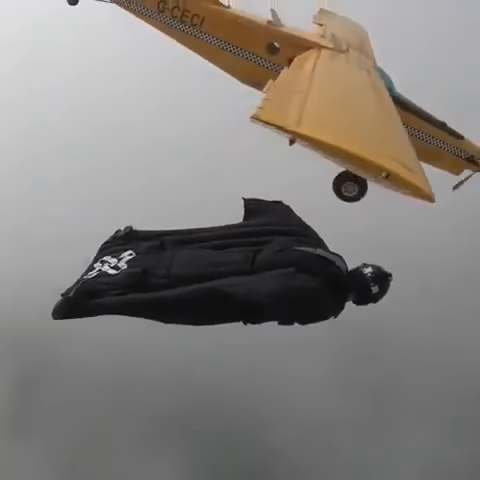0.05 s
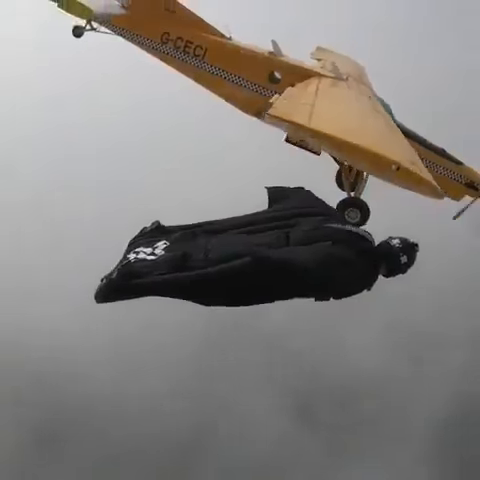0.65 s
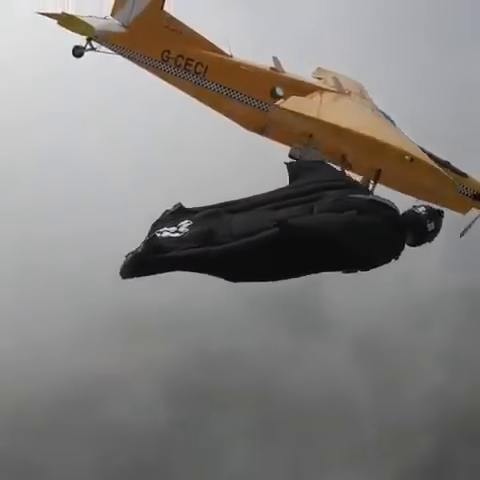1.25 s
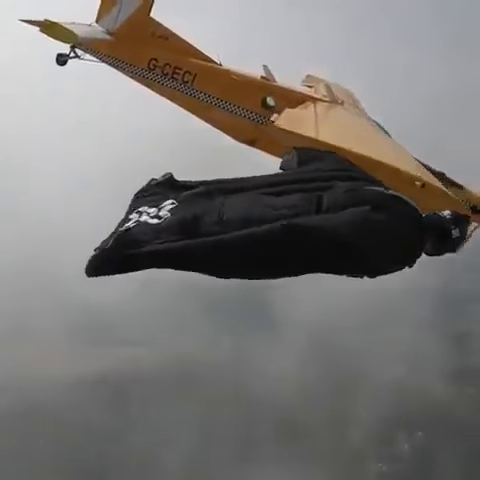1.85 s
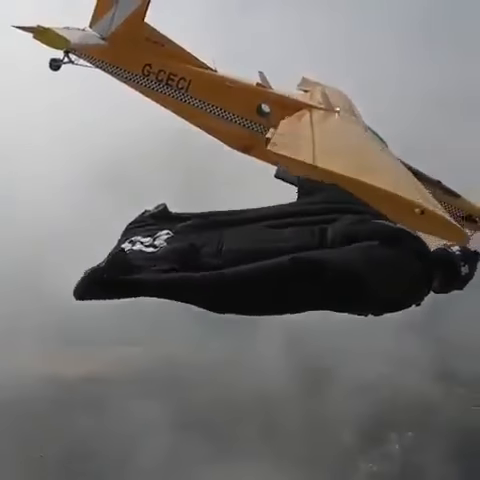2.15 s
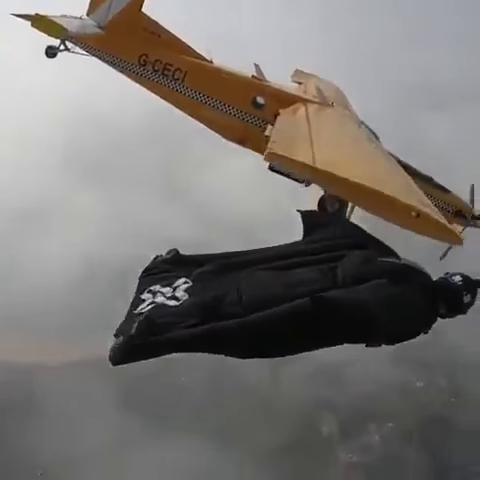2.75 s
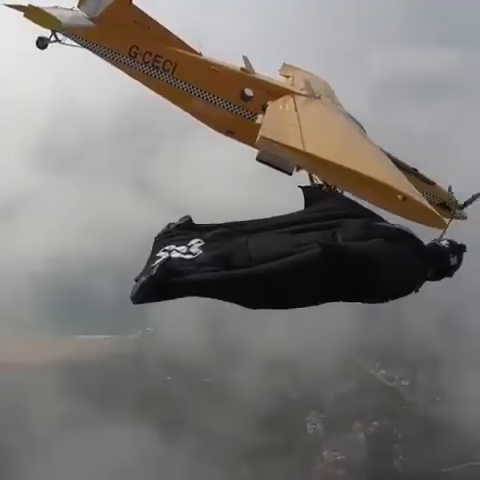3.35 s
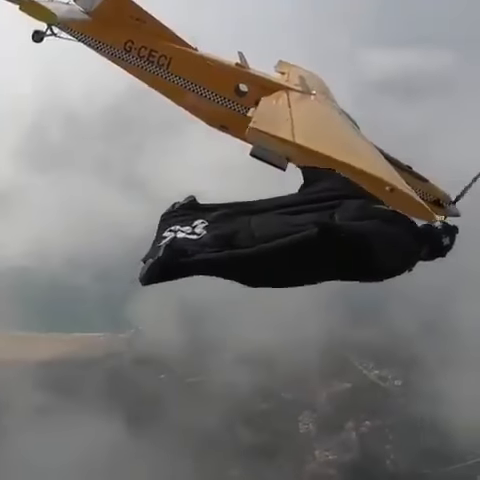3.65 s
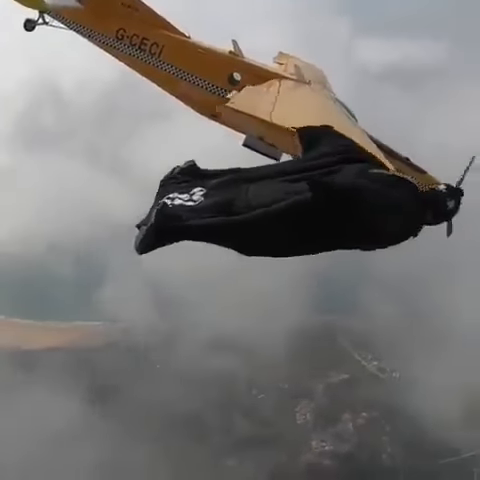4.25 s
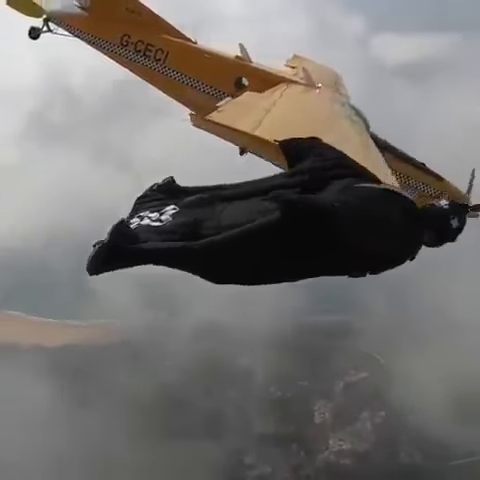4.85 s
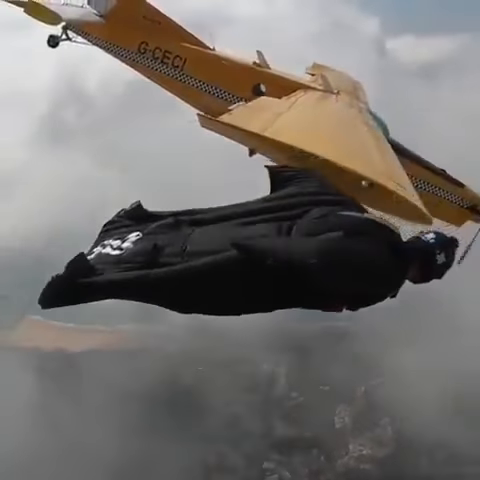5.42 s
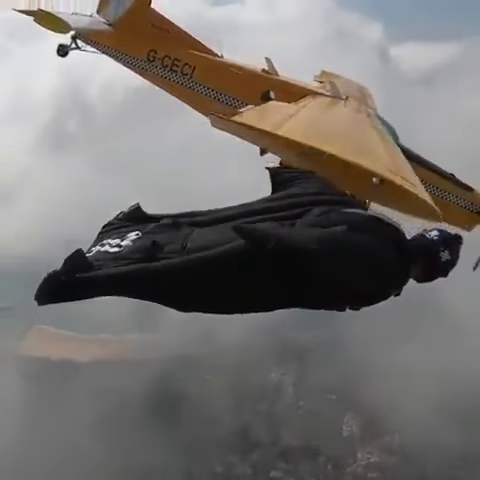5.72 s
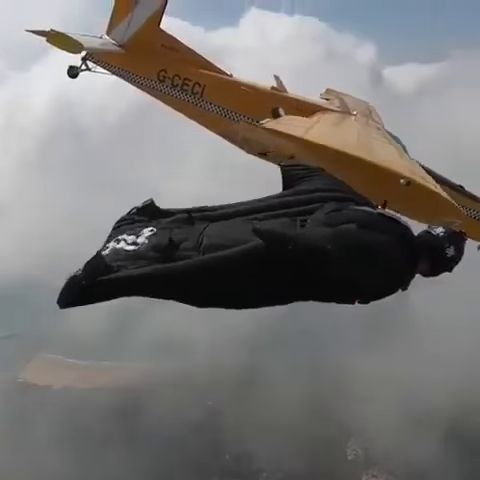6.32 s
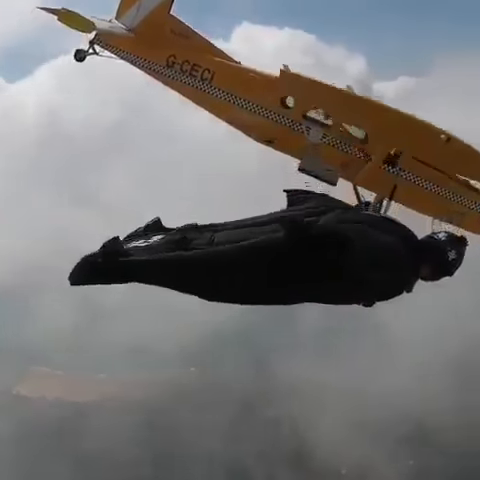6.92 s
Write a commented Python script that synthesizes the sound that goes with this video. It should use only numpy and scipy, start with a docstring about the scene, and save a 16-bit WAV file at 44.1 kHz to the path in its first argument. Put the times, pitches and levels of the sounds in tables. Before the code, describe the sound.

A loud, steady rush of wind buffets a microphone in flight, making a deep unbroken roar with a light hiss above.

```python
"""High in the open air, wind rushes over a camera in free flight.
Swirls of air (eddies) pound the microphone opening in a deep, unbroken roar, now and then with a
stronger thump. Above it, air sliding over the camera's case hisses, and a gap whistles faintly.
A quick limiter, which turns loud moments down, holds the roar at an even level."""
import sys
import numpy as np
from scipy import signal
from scipy.io import wavfile
from scipy.ndimage import uniform_filter1d

SR = 44100
rng = np.random.default_rng(int(sys.argv[2]) if len(sys.argv) > 2 else 0)


def wrap_up_sound(samples):
    """Save the sound to the file named by the first command line argument, as 16-bit audio."""
    columns = np.atleast_2d(samples).T
    # keep every value between -1 and 1, then stretch to whole-number steps
    tamed = np.clip(columns, -1, 1)
    steps = np.round(tamed * 32767).astype(np.int16)
    wavfile.write(sys.argv[1], SR, steps)


N = 307818
FRAME, HOP = 2048, 256  # noise is shaped in overlapping slices: their length and step in samples
HZ = np.fft.rfftfreq(FRAME, 1 / SR)
TIMES = np.arange(N // HOP + 9) * HOP / SR

# How the hiss swells as the case turns in the wind.
# Each row: time in seconds, swell of the coarse part, swell of the airy part.
HISS_SWELLS = [(0.0, -1.5, 1.5), (0.3, 0.9, -7.5), (0.75, -0.1, -4), (1.4, -2, -1.5), (1.8, -1.5, 0.2),
               (2.15, -1.4, 1.3), (2.65, 0, 2.5), (3.1, 0.6, 1.5), (3.45, 1.5, -0.7), (3.7, -0.5, -1.5),
               (4.05, 0.4, -5), (4.25, 2, -1.8), (4.47, 0.5, -1.7), (4.72, 3.5, 0), (4.93, 0.5, -0.5),
               (5.17, 3.5, -0.5), (5.35, 0.5, -3.5), (5.6, -1.1, -1.3), (6.02, 0.5, 0.5), (6.22, 0, -2.5),
               (6.5, -0.1, -3.5), (6.8, 0.5, -2), (6.98, 1, -5)]
# Single strong eddies that thump the microphone.
# Each row: middle in seconds, half length in seconds, pitch in Hz, peak in dB before the limiter.
STRONG_EDDIES = [(0.333, .02, 124, -11.5), (0.817, .03, 74, -10.5), (0.992, .02, 79.9, -4.5),
                 (1.695, .03, 76, -9), (2.496, .04, 80, -10.5), (3.208, .022, 69.6, -7),
                 (3.319, .02, 246, -9), (3.461, .04, 94, -11.5), (4.412, .024, 74, -9),
                 (4.84, 0.016, 203.6, -10.5), (5.254, .02, 174.5, -9.5)]


def amp(db):
    """Turns decibels into a gain."""
    return 10 ** (np.asarray(db) / 20)


def unit(x):
    """Scales a signal to an average (rms) level of 1."""
    return x / np.sqrt(np.mean(x ** 2) + 1e-20)


def colour(hz, values):
    """Joins values at a few pitches into a curve over all frequencies."""
    return np.interp(np.log(HZ + 1), np.log(hz), values)


def curve(rows, column=1):
    """Joins one column of a table into a curve over time, one value a slice."""
    table = np.transpose(rows)
    return np.interp(TIMES, table[0], table[column])[:, None]


def bell(x, middle, half_width):
    """A smooth hump of height 1."""
    return np.exp(-((x - middle) / half_width) ** 2)


def band(centre_hz, octaves):
    """A smooth hump around one pitch."""
    return bell(np.log2(HZ + 1), np.log2(centre_hz), octaves)


def spot(middle_s, half_s, shape):
    """Fades a shape over frequency in and out around one moment."""
    return np.outer(bell(TIMES, middle_s, half_s), shape)


def patches(span_s, span_hz):
    """Random unevenness over time and frequency, at level 1."""
    field = rng.standard_normal((len(TIMES), len(HZ)))
    field = uniform_filter1d(field, max(1, round(span_s * SR / HOP)), axis=0)
    return unit(uniform_filter1d(field, max(1, round(span_hz * FRAME / SR)), axis=1))


def noise(shape_db):
    """Noise at level 1 that follows a shape over time and frequency."""
    white = rng.standard_normal((len(TIMES) - 1) * HOP)
    slices = signal.stft(white, nperseg=FRAME, noverlap=FRAME - HOP)[2]
    shaped = signal.istft(slices * amp(shape_db).T, nperseg=FRAME, noverlap=FRAME - HOP)[1]
    return unit(shaped[:N])


def air_speed(usual_edge_hz=600):
    """How fast the air passes the microphone; 1 is the usual speed."""
    # Faster air makes the roar reach higher. Each row: time in seconds, top edge of the roar in Hz.
    roar_edge = [(0, 620), (.55, 611), (1, 608), (1.3, 588), (1.8, 580), (2.2, 592), (2.5, 578),
                 (2.85, 588), (3.3, 590), (3.7, 586), (4.5, 594), (5, 594), (5.5, 597), (5.85, 600),
                 (6.98, 617)]
    return curve(roar_edge) / usual_edge_hz


def eddy_roar():
    """Eddies of all sizes hit the microphone; faster air sheds them faster and lifts the roar's pitch."""
    # The push of the eddies. Each row: frequency in Hz, relative level in dB.
    roar_tone = [(10, -24), (22, -4), (38, 0), (78, -0.5), (115, -2.13), (175, -6), (300, -8), (480, -10),
                 (590, -13.5), (675, -20), (745, -27), (900, -35), (1200, -44.5), (2500, -83.5)]
    # The deepest rumble. Each row: time in seconds, swell.
    rumble_swells = [(0.0, 1), (0.22, -10), (0.35, -5.5), (0.6, -5.5), (0.97, -7), (1.1, 7), (1.32, 15),
                     (1.55, -6.5), (2.0, -3.5), (2.13, -13.5), (2.35, -3), (2.62, -2), (3.1, 8.5),
                     (3.55, 2), (3.92, 4.5), (4.06, -9.5), (4.33, -12), (4.55, 6), (4.78, 3.5), (5.0, 0),
                     (5.22, 12.5), (5.53, -12.5), (5.67, 7.5), (6.1, 6.5), (6.35, 2), (6.6, 15.5),
                     (6.98, -2.5)]
    # Big eddies grow at the cost of middling ones. Each row: frequency in Hz, dB per step of swell.
    rumble_shares = [(40, 0.32), (100, -0.08), (250, 0.05), (450, 0)]
    # One size of eddy thins out and the roar turns hollow.
    # Each row: middle in seconds, half length in seconds, pitch in Hz, change in dB.
    lulls = [(0.352, 0.4, 417, -3), (1.3, .2, 194, -2), (1.35, .06, 95, -5), (2.516, 0.09, 730, -2.5),
             (2.79, 0.22, 107.4, -4), (2.956, 0.17, 340, -3.5), (3.286, 0.036, 60, -11),
             (3.718, 0.37, 522, -5), (3.78, .1, 188, -5.5), (4.92, 0.76, 96.4, -3), (5.08, 0.21, 560, -1.5),
             (5.98, 0.04, 90, -7.5), (6.12, .38, 206, -3.5)]
    # One size of eddy takes over, in a low boom or a hollow whoop. The rows read like those of the lulls.
    surges = [(0.2, 0.33, 100, 3), (0.65, 0.3, 203, 4), (1.57, 0.19, 350, 4), (2.151, 0.17, 205, 8),
              (2.203, .1, 100, 3.5), (2.807, .08, 870, 7), (3.5, .22, 255, 3), (3.78, 0.1, 79.4, 1.5),
              (4.137, 0.07, 173, 2.5), (4.434, 0.07, 320, 5), (4.593, 0.41, 565, 2.3),
              (4.86, 0.08, 207, 4.5), (5.348, 0.33, 168, 3.5), (5.503, 0.077, 95.5, 6.5),
              (5.797, 0.1, 556, 4), (6.198, 0.56, 880, 4), (6.92, 0.11, 636, 1.5)]
    # The opening rings with a hollow note that sinks as the camera turns.
    # Each row: time in seconds, pitch in Hz, gain in dB.
    hollow_note = [(1.7, 520, -0.5), (1.87, 530, 5.5), (2.25, 582, 4.5), (2.7, 538, 1), (3.2, 480, 2),
                   (3.7, 476, 1), (4.0, 477, -1)]

    tone_hz, tone_db = np.transpose(roar_tone)
    shape_db = np.interp(np.log((HZ + 1) / air_speed()), np.log(tone_hz), tone_db)
    shape_db += curve(rumble_swells) * colour(*np.transpose(rumble_shares))
    shape_db += 0.59 * curve(HISS_SWELLS) * band(215, octaves=0.62)  # swells with the coarse hiss
    for middle, half, hz, change_db in lulls:
        shape_db += change_db * spot(middle, half, band(hz, octaves=0.39))
    for middle, half, hz, change_db in surges:
        shape_db += change_db * spot(middle, half, bell(HZ, hz, half_width=25 + 0.083 * hz))
    for middle, half, hz, _ in STRONG_EDDIES:  # each sweeps away smaller eddies near its pitch
        shape_db -= 0.5 * spot(middle, half, band(hz, octaves=0.39))
    shape_db += curve(hollow_note, column=2) * bell(HZ, curve(hollow_note), half_width=28)
    shape_db += 0.62 * patches(span_s=0.31, span_hz=110)
    return amp(-11.5) * noise(shape_db)


def limit(x, ceiling_db, span_s):
    """Turns the sound down smoothly wherever its level nears the ceiling."""
    window = signal.windows.hann(max(3, round(span_s * SR)))
    power = abs(signal.oaconvolve(x ** 2, window / window.sum(), "same"))
    return x / (1 + (power / amp(ceiling_db) ** 2) ** 2) ** (1 / 4)


def roar_limiter(pressure, split_hz=160):
    """Holds down the bass and the rest separately, then both together more quickly."""
    bass = signal.sosfiltfilt(signal.butter(3, split_hz, fs=SR, output="sos"), pressure)
    held_bass = limit(bass, ceiling_db=-9.5, span_s=0.074)
    held_rest = limit(pressure - bass, ceiling_db=-12.5, span_s=0.025)
    return limit(held_bass + held_rest, ceiling_db=-5.5, span_s=0.0054)


def hiss_swell():
    """The hiss changes (in dB) as the case turns; its lowest and highest parts follow air speed most."""
    # Each row: frequency in Hz, dB per step of coarse swell, dB per step of airy swell.
    swell_shares = [(1000, 0.35, 0.2), (1800, 1.37, 0.078), (3300, 0.16, 0.67), (6500, .1, 0.47)]
    hz, coarse, airy = np.transpose(swell_shares)
    coarse_db = curve(HISS_SWELLS) * colour(hz, coarse)
    airy_db = curve(HISS_SWELLS, column=2) * colour(hz, airy)
    speed_power = 8.2 * colour([950, 1400, 3500, 6000], [1.9, 0.21, 0.44, 1.2])
    return coarse_db + airy_db + speed_power * 20 * np.log10(air_speed())


def case_hiss(roar, flutter=0.08):
    """A thin layer of air hisses as it slides over the case, fluttering with each passing eddy."""
    # The tone of the sliding air. Each row: frequency in Hz, relative level in dB.
    hiss_tone = [(200, -7), (900, -2), (1350, 0.9), (1600, -2), (2100, -2), (2600, -2), (3200, 0.6),
                 (3600, -1), (4000, -6), (4300, -10.5), (5200, -14.5), (7000, -20), (9000, -24.5),
                 (11000, -28.5), (12000, -31)]
    shape_db = colour(*np.transpose(hiss_tone)) + hiss_swell()
    puffs = 1.87 * patches(span_s=0.052, span_hz=450)
    flicker = 0.9 * patches(span_s=0.035, span_hz=5200)
    unevenness = colour([1000, 4000, 10000], [0.7, 0.7, 1.5])  # the highest hiss is the least steady
    air = noise(shape_db + unevenness * (puffs + flicker))
    return amp(-39.0) * unit(air * np.exp(flutter * unit(roar)))


def gap_whistle(pitch_hz=1810, width_hz=89, level_db=-55):
    """The wind makes a gap ring with a weak, breathy note."""
    # The wind briefly meets the gap head on.
    # Each row: middle in seconds, half length in seconds, gain in dB.
    head_on = [(0.678, 0.42, 7), (2.1, .27, 6)]
    t = np.arange(N) / SR
    shape_db = -20 * np.log10(1 + ((HZ - pitch_hz) / width_hz) ** 2)
    swell_db = sum(gain_db * bell(t, middle, half) for middle, half, gain_db in head_on)
    return amp(level_db + swell_db) * noise(shape_db[None])


def eddy_thumps(max_glide=0.2):
    """Each strong eddy swings the air pressure a few times, sliding in pitch as it passes."""
    pressure = np.zeros(N)
    for middle, half, hz, peak_db in STRONG_EDDIES:
        phase, slide = rng.uniform(-1, 1, 2)
        t = np.arange(N) / SR - middle
        cycles = hz * np.cumsum(1 + max_glide * slide * np.tanh(t / half)) / SR
        pressure += amp(peak_db) * bell(t, 0, half) * np.sin(2 * np.pi * cycles + np.pi * phase)
    return pressure


def scene():
    """Roar and thumps go through the limiter; hiss and whistle lie on top."""
    pressure = eddy_roar() + eddy_thumps()
    roar = amp(-12.0) * unit(roar_limiter(pressure))
    return (roar + case_hiss(roar) + gap_whistle())[None]


def record(dry, fade_s=0.004, top_hz=11750):
    """Softens both ends and cuts off the highest treble steeply."""
    from_end_s = np.minimum(np.arange(N), np.arange(N)[::-1]) / SR
    fade = np.sin(np.pi / 2 * np.minimum(from_end_s / fade_s, 1)) ** 2
    treble_cut = signal.firwin(301, top_hz, window=("kaiser", 9), fs=SR)
    return signal.oaconvolve(dry * fade, treble_cut[None], "same")


dry = scene()
out = record(dry)
wrap_up_sound(out)
```